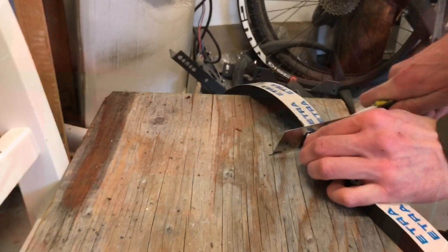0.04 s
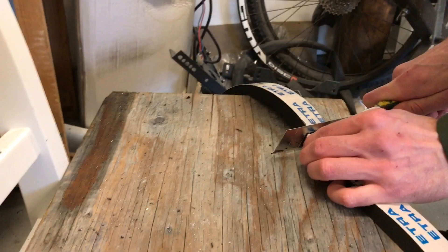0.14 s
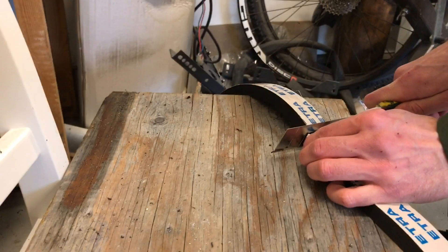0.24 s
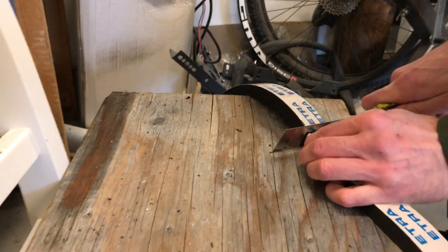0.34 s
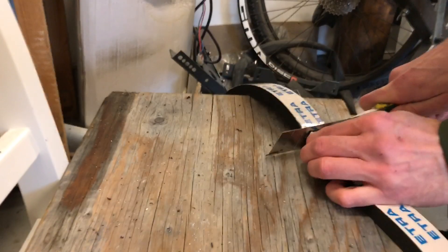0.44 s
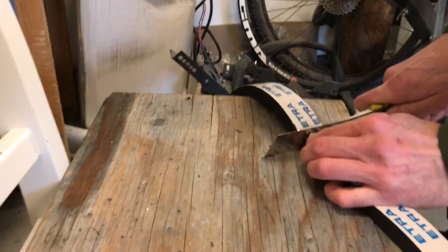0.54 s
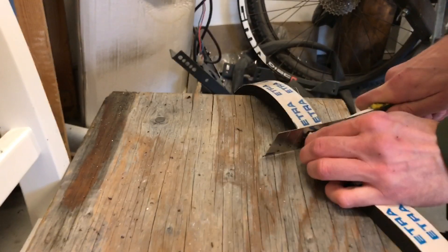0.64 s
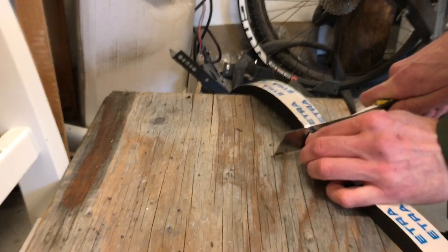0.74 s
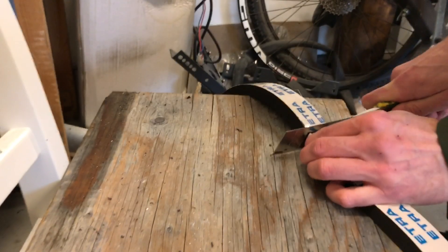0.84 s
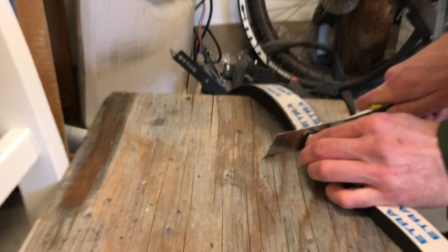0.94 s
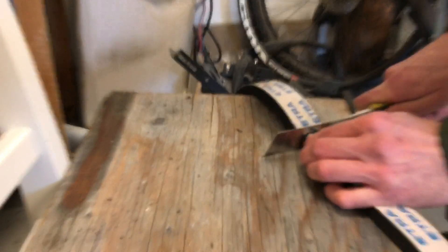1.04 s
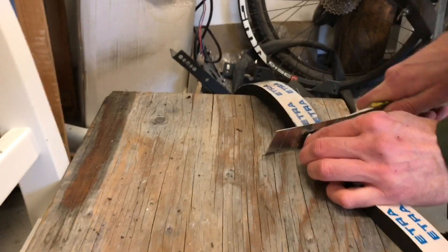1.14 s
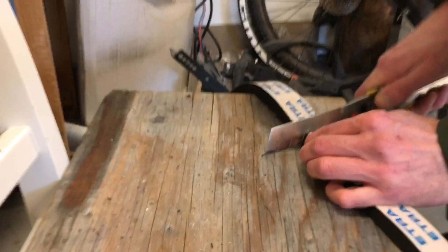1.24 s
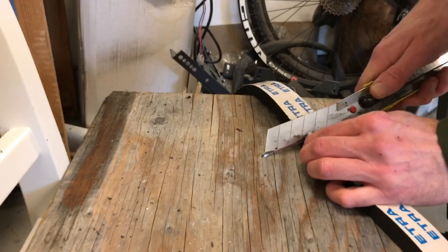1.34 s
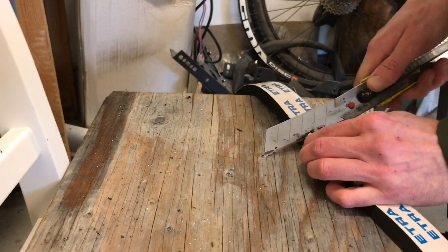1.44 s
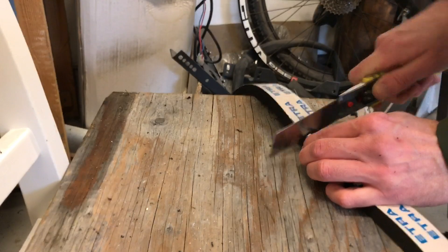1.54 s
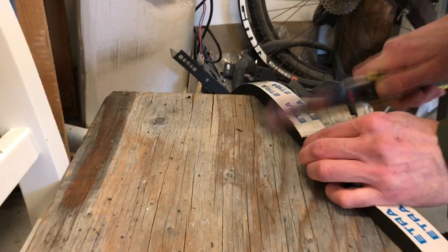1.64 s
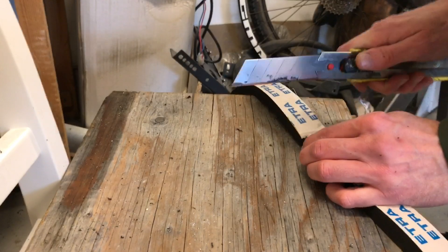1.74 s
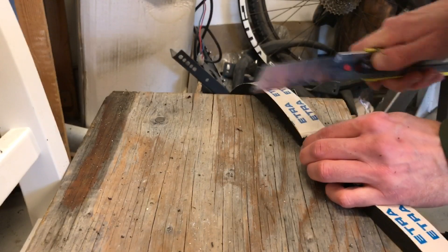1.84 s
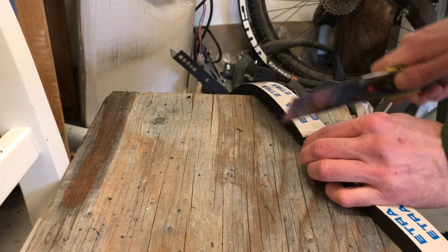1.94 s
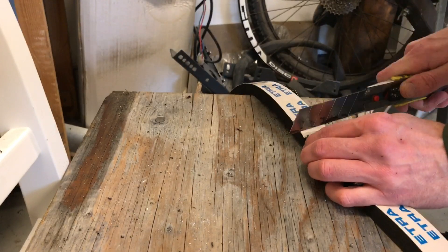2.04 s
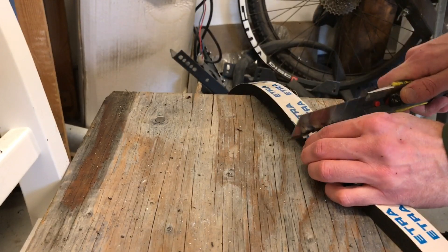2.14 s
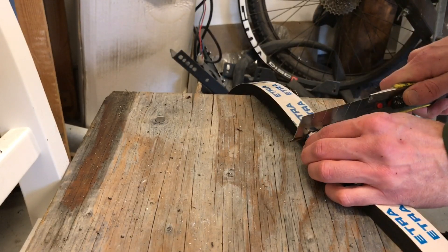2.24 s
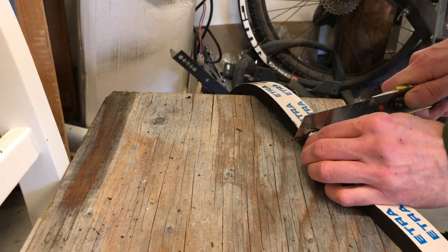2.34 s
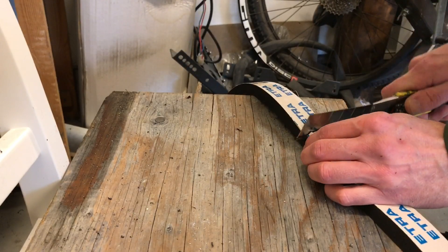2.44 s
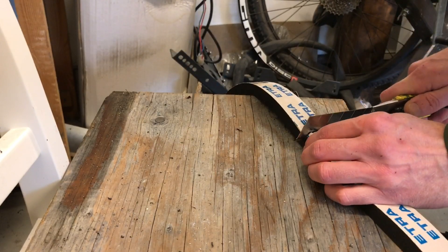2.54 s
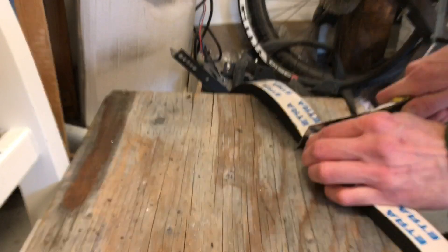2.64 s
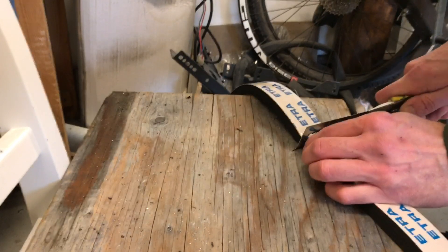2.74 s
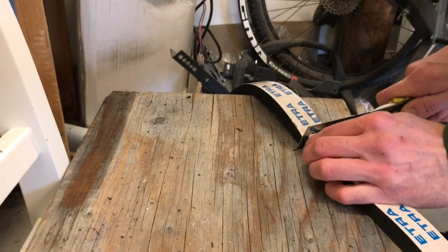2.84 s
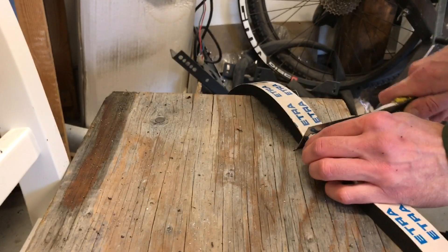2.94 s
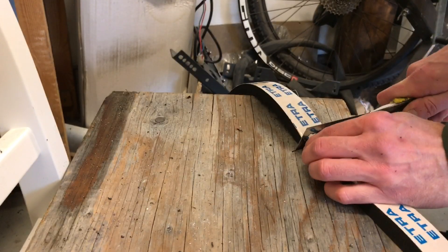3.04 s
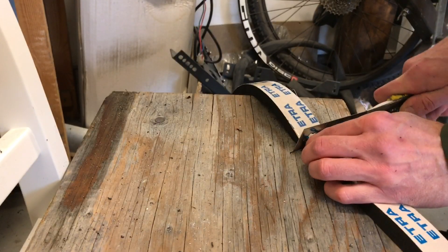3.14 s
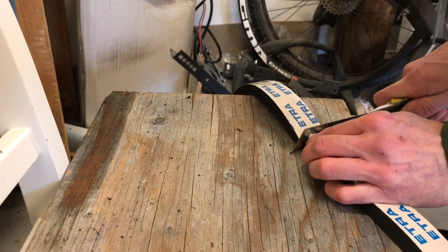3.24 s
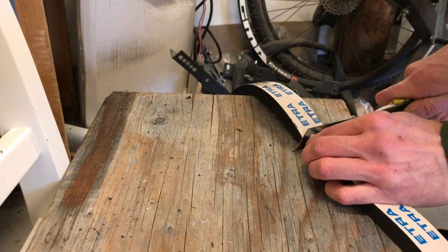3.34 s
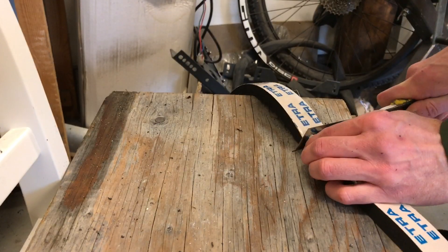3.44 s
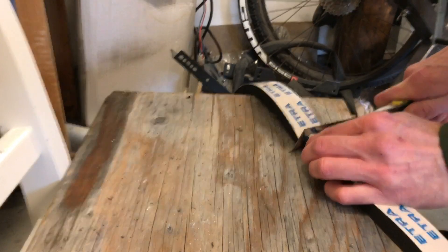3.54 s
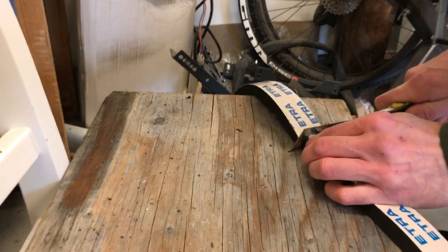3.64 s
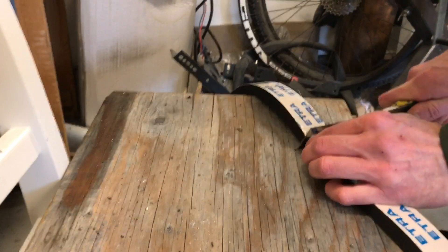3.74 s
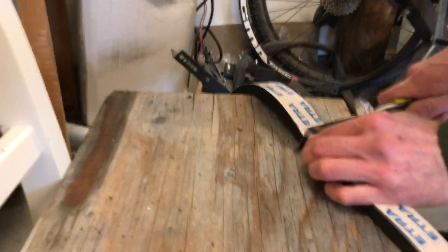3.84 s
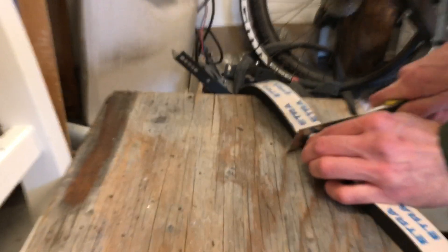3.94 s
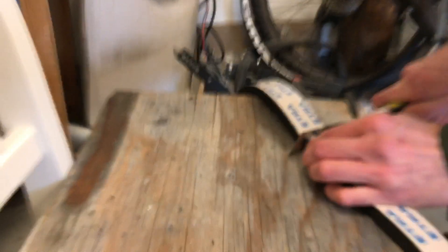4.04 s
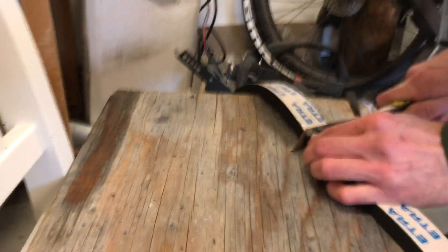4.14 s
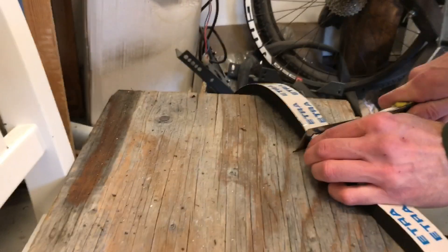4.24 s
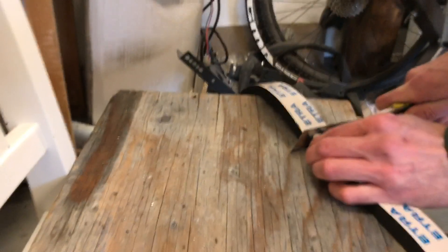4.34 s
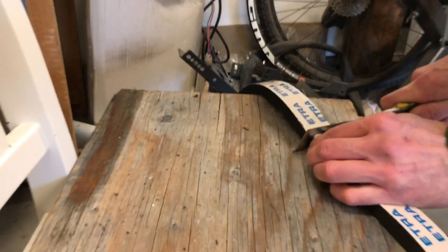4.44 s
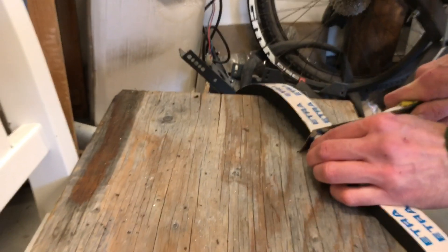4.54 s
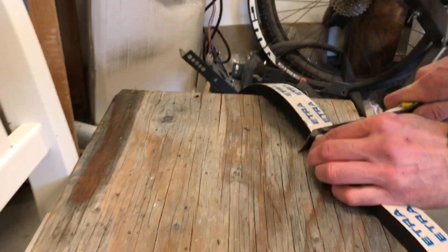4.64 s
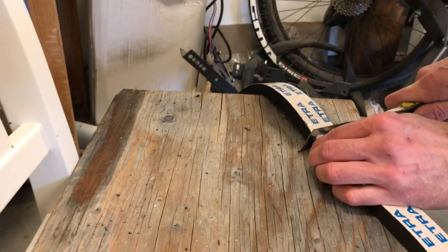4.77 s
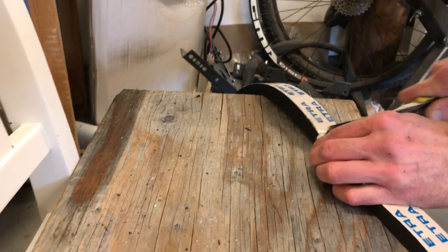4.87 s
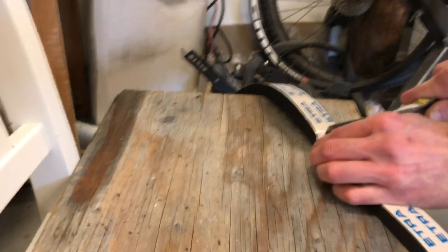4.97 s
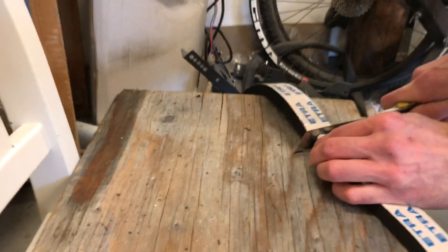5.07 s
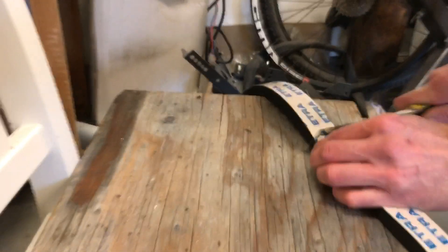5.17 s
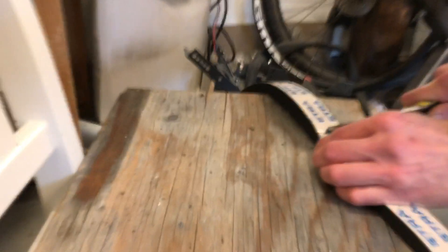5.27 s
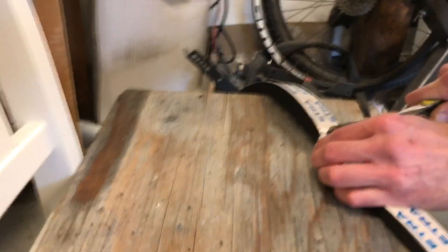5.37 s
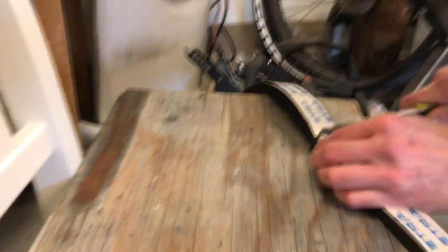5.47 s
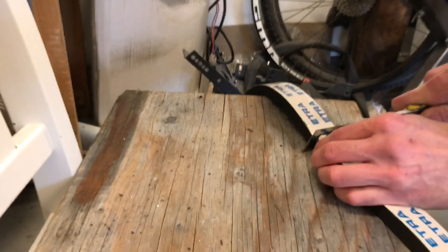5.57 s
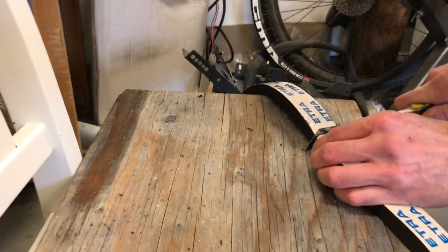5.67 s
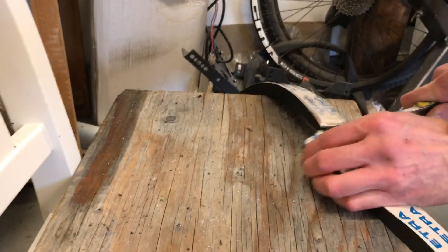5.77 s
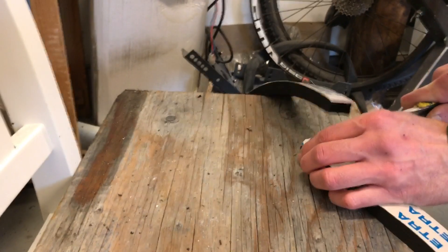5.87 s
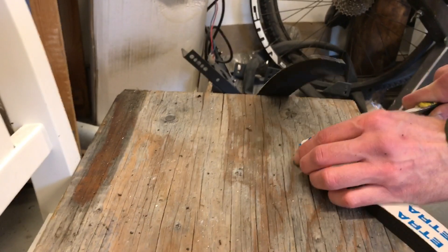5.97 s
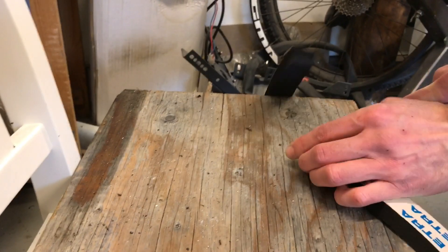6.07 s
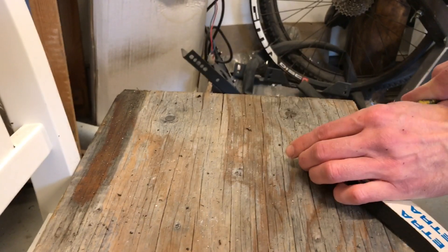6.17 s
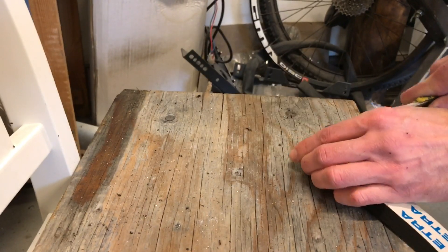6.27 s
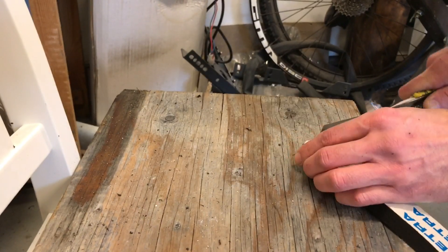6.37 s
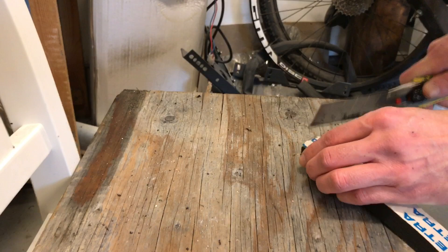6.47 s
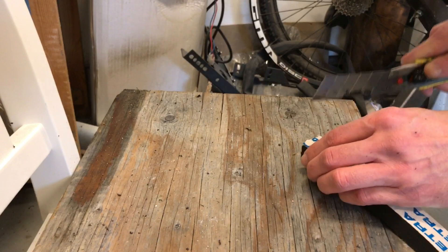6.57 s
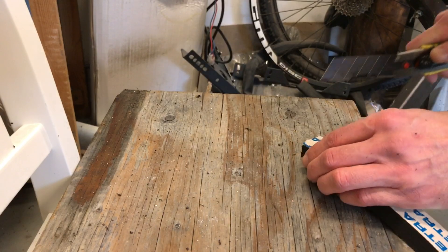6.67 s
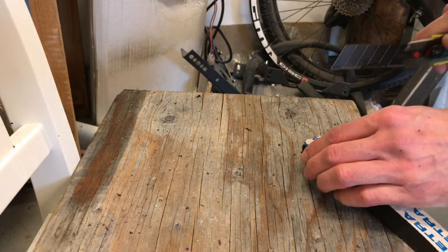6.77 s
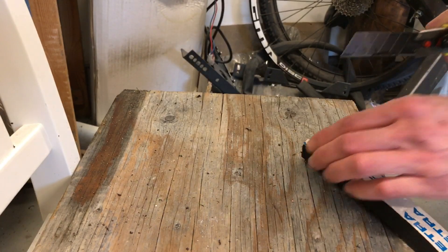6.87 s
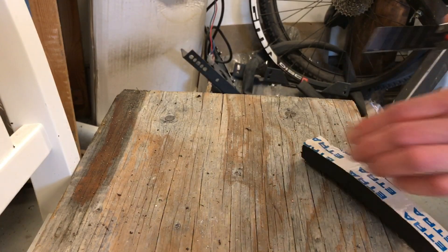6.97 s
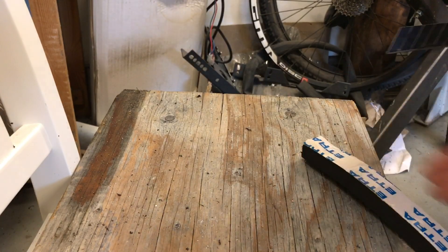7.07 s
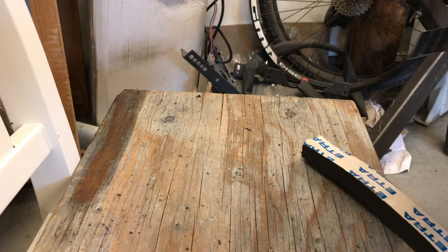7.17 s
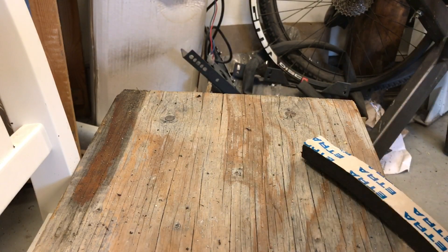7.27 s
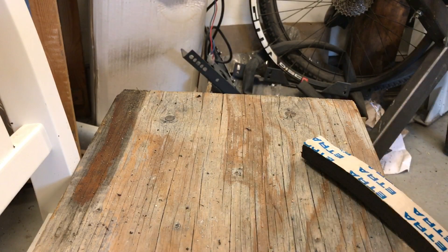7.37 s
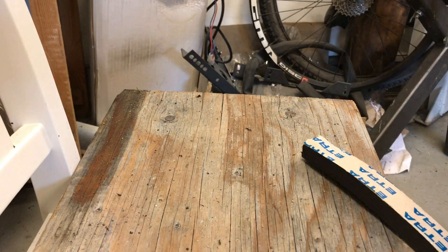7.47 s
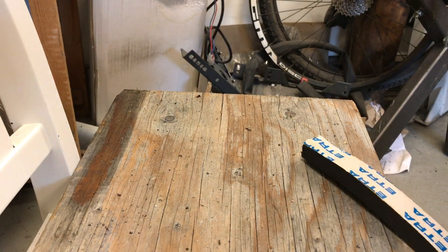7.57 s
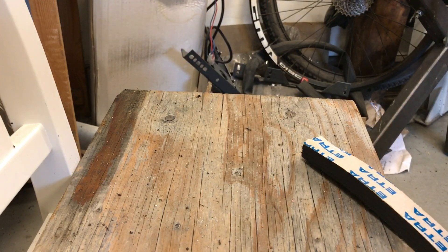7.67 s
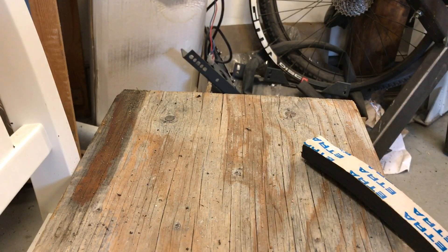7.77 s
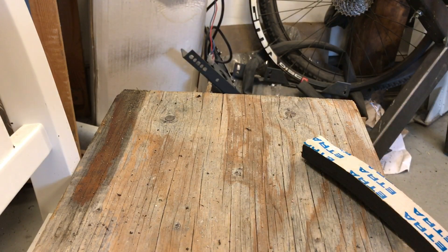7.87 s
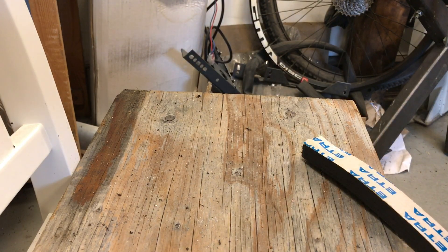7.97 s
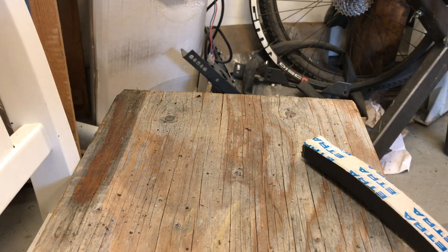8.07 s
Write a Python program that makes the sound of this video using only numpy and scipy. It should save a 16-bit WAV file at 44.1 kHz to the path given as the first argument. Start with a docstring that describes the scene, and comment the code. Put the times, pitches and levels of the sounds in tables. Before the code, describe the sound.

A snap-off knife saws through thick foam tape on a wooden bench, with gritty rasps, metallic clicks, brief squeaks and dull thumps.

```python
"""On a wooden bench in a small workshop, a long snap-off knife saws through thick foam tape, close to a phone.
Each stroke is noisy grit, like tearing foam, that shakes the blade; squeaks are wavering tones with overtones.
Short taps ring the blade as clicks. Blows ring the bench top, rocking hums, and the hands feed a deep rumble.
Faint rustling, a few knocks further off, the room's echo and a steady hiss fill the background."""
import sys
import numpy as np
from scipy import signal
from scipy.fft import rfft, irfft
from scipy.io import wavfile
from scipy.ndimage import uniform_filter1d

SR = 44100
rng = np.random.default_rng(int(sys.argv[2]) if len(sys.argv) > 2 else 0)


def inscribe(sig):
    """Save sig as 16-bit PCM at rate SR to the path in sys.argv[1].

    A 1-D sig is mono; a 2-D sig holds one channel per row.
    Samples are clipped to [-1, 1] before scaling.
    """
    pcm = np.round(np.clip(np.atleast_2d(sig).T, -1, 1) * 32767)
    wavfile.write(sys.argv[1], SR, pcm.astype(np.int16))


N = 357549  # length in samples

# Saw strokes: t/s at full bite, rise/s, hold/s, level/dB, treble share/dB
STROKES = [(0.445, .036, 0.023, -50, -6.5), (0.52, 0.054, 0.0029, -40, -1), (0.702, .005, 0.023, -55.5, -7),
           (0.735, .0014, 0.029, -49, -4), (0.954, 0.04, 0.015, -40.5, -1),
           (1.097, 0.031, 0.0064, -55.5, -7), (1.209, 0.056, 0.023, -58.5, 1),
           (1.508, .003, 0.048, -59, .5), (1.5542, 0.0035, 0.0045, -28.5, -4.5),
           (1.564, .006, 0.036, -46, 1), (2.183, 0.02, .006, -61, -5), (2.443, 0.0074, 0.042, -60.5, -3.5),
           (2.595, 0.0048, 0.051, -46.5, -8.5), (2.636, 0.0054, 0.009, -40.5, -6),
           (3.127, 0.034, 0.043, -56.5, -2), (3.215, .012, 0.0092, -68.5, 6.5),
           (3.317, 0.011, 0.017, -65, -4), (3.581, 0.0014, 0.025, -50.5, 2),
           (3.743, 0.05, 0.027, -55.5, -2), (3.833, 0.0039, 0.0073, -52.5, -4),
           (3.916, 0.027, 0.017, -38.5, -0.5), (3.95, .008, 0.076, -46.5, -26),
           (4.048, .007, 0.032, -53, -7), (4.1386, 0.0054, 0.0078, -42, -11.5),
           (4.16, .01, 0.027, -59.5, 3.5), (4.296, .024, 0.023, -46, -4.5), (4.423, .01, 0.025, -56, -8.5),
           (4.516, 0.0085, 0.049, -46, -4.5), (4.8545, 0.0062, 0.051, -40, -2.5),
           (5.025, .005, 0.049, -51.5, 2), (5.084, 0.025, .012, -38.5, -0.5),
           (5.131, .006, 0.073, -45.5, -3), (5.211, 0.0064, 0.015, -44.5, -9),
           (5.291, 0.019, 0.047, -47, -7), (5.471, 0.0037, 0.078, -40.5, -3.5),
           (5.713, .0063, 0.049, -48, -3), (5.762, .0045, .061, -51, -2), (5.877, .0096, 0.027, -54, -7),
           (5.936, .007, 0.036, -52.5, -13), (6.058, 0.081, 0.0083, -49, -6), (6.08, .005, 0.079, -59, -1),
           (6.245, .006, 0.034, -56.5, -32)]
SAG_DB_PER_S, LET_GO_S = 114, 0.013  # a held stroke loses bite, then lets go
LOW_SHARE_DB = -5
# Where the blade rings: f/Hz, width/Hz, level/dB
BLADE_MODES = [(1700, 200, -38), (2240, 940, 0.5), (2800, 450, -6), (3580, 456, 2), (4200, 350, -2.5),
               (5230, 720, -0.5)]
# Where the blade rings in the treble: f/Hz, width/Hz, level/dB
BLADE_TREBLE_MODES = [(6750, 790, 5.5), (8720, 1000, 7), (11920, 3300, 3.5), (15100, 4900, 0)]

# Squeaks, where the blade sticks and slips: t/s, length/s, first f/Hz, last f/Hz, level/dB, loss per overtone/dB
SQUEAKS = [(0.499, 0.021, 3880, 4200, -42, 11), (0.955, 0.026, 4120, 4170, -38.5, 11),
           (3.575, 0.037, 1700, 1680, -60.5, -2), (4.133, 0.015, 1700, 1700, -50, 13),
           (4.509, 0.018, 928, 1204, -51.5, 6), (4.529, 0.028, 1242, 1120, -47, 2),
           (4.853, 0.016, 1914, 2390, -41, 21), (4.89, 0.021, 7000, 3760, -46, 19),
           (5.158, 0.0118, 3490, 5520, -39.5, 19), (5.198, 0.01, 5470, 3960, -44, 11),
           (5.212, 0.0098, 2440, 1700, -46, 5), (5.472, 0.02, 1700, 1790, -43.5, 8),
           (5.513, 0.013, 1700, 1700, -46, 2.5), (5.704, 0.047, 2284, 5400, -47, 3)]
# the higher a squeak, the more it wavers and breaks off
SQUEAK_ROUGH_HZ, PATCHY_DB, WAVER = 4000, 3, .45
TOP_HZ = 15900  # the phone passes nothing much above this

# Blade clicks: t/s, level/dB (peak before treble), strongest f/Hz, treble share/dB
CLICKS = [(.141, -33, 4170, -20), (.1688, -27.5, 2120, -1), (0.3147, -39, 1470, -24), (.367, -52, 3580, -6),
          (.381, -44, 3850, 2), (0.7087, -45, 3740, 0), (0.7223, -41, 8100, 6.5), (.736, -23.5, 4230, -6.5),
          (0.9297, -36, 1500, -20), (0.937, -39, 4100, -24), (1.4202, -33, 3230, -7),
          (1.4474, -40.5, 2670, -1), (1.515, -41, 5940, 0), (1.5553, -17.5, 2800, -4.5),
          (1.6416, -15.5, 3300, -40), (1.648, -19.5, 2240, -35), (1.6596, -27.5, 2240, -30.5),
          (1.8407, -48.5, 4130, -20), (1.9235, -44.5, 5140, 2), (1.965, -47, 2240, 6),
          (2.2864, -46, 3680, -6), (2.6004, -28.5, 3440, -31), (2.6379, -27, 1810, -23),
          (2.9871, -47, 3260, 3.5), (3.0837, -41, 3500, -4), (3.1123, -43, 3600, 3), (3.126, -49, 3600, 3),
          (3.137, -42.5, 3600, 0), (3.26, -52, 4080, -21), (3.403, -44.5, 3820, 4),
          (3.582, -35.5, 6600, -12), (3.8, -43, 3530, -4), (3.9057, -34, 3370, 2), (3.913, -28, 2600, -31),
          (3.923, -34, 3610, -18), (3.955, -29, 2280, -22), (3.9682, -29, 2410, -8),
          (3.9778, -28.5, 2240, -18), (3.987, -32.5, 2360, -25), (4.0849, -38, 3250, -5),
          (4.1287, -38.5, 2170, -13), (4.278, -40, 2060, -18), (4.3808, -50, 2030, 5),
          (4.526, -34.5, 2240, -0.5), (4.5767, -36.5, 5650, -3), (4.5816, -35, 5760, -1.5),
          (4.8246, -46.5, 1730, -6), (4.8436, -32.5, 3770, -3), (4.8576, -39, 2230, -30),
          (4.886, -32, 6660, -16), (5.0192, -33.5, 3460, -7), (5.0254, -30, 4000, -1),
          (5.0319, -26.5, 3730, -1.5), (5.087, -35, 5030, 16), (5.1317, -35, 2550, -11),
          (5.1422, -39, 3610, -21), (5.458, -40, 3690, -2), (5.47, -47, 1680, -24),
          (5.76, -33.5, 4700, -0.5), (5.98, -47, 1720, 3), (6.0596, -33.5, 3700, -21),
          (6.443, -49.5, 8000, 8), (6.4531, -39, 1560, -14)]
CLICK_ROOM_DB = -11.5
KNIFE_LIFTS_S = 6.2
# faint ticks at random moments while the knife is in the foam
TICK_DB, TICK_HZ, TICK_TREBLE_DB = -50, 3700, -10

# Blows on the bench: t/s, peak level/dB, extra for board modes above 400 Hz/dB
THUDS = [(0.312, -27, 5), (.657, -50, 8), (.72, -41.5, 10), (.871, -32.5, -3.5), (.955, -36, 15),
         (1.247, -47, -17), (1.549, -35.5, -16), (1.641, -37.5, -17), (2.598, -46, 13), (2.638, -45, -2),
         (3.541, -52, 0), (3.656, -40, 13), (3.749, -53, -5), (3.866, -45, 11), (4.308, -30.5, -9),
         (4.86, -43, 2), (5.09, -25, -5), (5.13, -32.5, 7), (5.31, -49, -5), (5.39, -44, 0),
         (5.72, -54, -8), (5.759, -47, 12), (5.868, -49, 13), (6.306, -39.5, -9), (7.482, -44.5, 6),
         (6.865, -50, -2)]
# Where the bench top rings: f/Hz, time to fade by 60 dB/s, level/dB
BENCH_MODES = [(184, 0.047, 1.5), (269.2, 0.042, 2), (320.3, 0.058, -16.5), (400, 0.017, 6.5),
               (558, 0.025, 2), (696, 0.071, -6), (886, 0.037, -14.5), (1083, 0.05, -18)]
THUD_RISE_MS = 5.4
RATTLE_DB, RATTLE_T60_S = -26, 0.46  # the board rattles on after each blow
# The bench rocks on its legs and rings out: t/s, level/dB, f/Hz, time to fade by 60 dB/s
ROCKS = [(0.451, -39.5, 102.3, 0.3), (1.03, -52, 96, 0.14), (1.565, -41.5, 98.8, 0.46),
         (2.476, -48, 99.6, 0.26), (2.645, -28.5, 97.9, 0.19), (2.731, -52.5, 98.8, 0.88),
         (6.448, -41.5, 98, .45)]
# Steady weight of the hands on the bench: t/s, rumble level/dB
PRESS = [(0, -65), (1.5, -69.5), (2.5, -69), (3.38, -71.5), (3.54, -61.5), (3.86, -54.5), (4.26, -54),
         (4.8, -60), (5.35, -51.5), (5.68, -63), (5.93, -61.5), (6.27, -71), (6.65, -71.5), (7.45, -69),
         (7.65, -67.5), (8.1, -73.5)]
BOARD_PRESS_DB = -6
# Shoves that drag the bench: t/s at strongest, rumble level/dB, share of the top board/dB
SHOVES = [(.01, -55.5, -6), (.36, -60, -9), (.47, -47.5, -2.5), (.72, -49, -6), (1.04, -44.5, -7),
          (1.26, -56, -19), (1.62, -55, -10), (2.66, -50, -15), (3.95, -52.5, -1.5), (4.06, -48.5, -6.5),
          (4.34, -49, -5), (4.9, -53.5, -5), (5.1, -48.5, -3.5), (5.19, -48, -24), (5.55, -53, -9),
          (5.74, -56, -9), (5.88, -60, -8), (6.47, -56.5, 2.5)]
SHOVE_UP_DB_PER_S, SHOVE_DOWN_DB_PER_S = 201, 143

# Foam, paper and sleeves rustling: t/s, level/dB, share that rings the blade/dB
RUSTLE = [(0.0, -67, -15), (0.13, -70.5, -21), (0.36, -65, -20), (0.86, -64.5, -11), (1.46, -66.5, -10.5),
          (1.62, -60, 11), (1.98, -71.5, -24), (3.54, -65.5, -15), (3.99, -63.5, -21), (4.87, -67.5, -43),
          (5.05, -59.5, -5), (5.44, -65, -16), (5.71, -59.5, -2), (6.45, -67, -21), (6.56, -63.5, -4),
          (7.58, -63.5, 4), (7.96, -69.5, -0.5), (8.1, -75.5, -3)]

# Knocks further off: t/s, peak level/dB, lowest f/Hz, highest f/Hz, clatter length/ms,
# treble share/dB, room share/dB, ring level/dB, strongest ring f/Hz
KNOCKS = [(6.304, -28, 640, 1440, 3.2, -8.5, 2.5, -13.5, 1000),
          (6.371, -36, 400, 1650, 2.7, -5.5, 0, -19, 1000),
          (6.499, -30, 2800, 10800, 3.6, -16, -8, -18, 4700),
          (6.771, -27, 2544, 7500, 5.6, -6, -6.5, -24.5, 5400),
          (7.481, -21.5, 413, 2560, 5, -42, -2.5, -20, 1000)]
# Wood (1000 Hz) and metal that ring after a knock: f/Hz, time to fade by 60 dB/s, level/dB
KNOCK_RINGS = [(1000, 0.24, -1), (3300, .15, 4), (4770, 0.18, -3), (5400, 0.49, -7)]

# How the room fades, band by band: f/Hz, time to fade by 60 dB/s, level/dB
ROOM = [(203, 0.11, -3.5), (519, 0.37, 3), (1346, 0.48, -1), (3210, 0.4, 0.5), (7000, 0.23, -1),
        (14100, 0.23, -5.5)]
# Tone colour of the steady background: f/Hz, relative level in each Hz/dB
AIR = [(15, -71), (25, -8), (59, -16), (223, 7), (503, 1), (887, -3), (1190, -1), (1330, -23), (3080, -29),
       (3520, -29), (7920, -70), (12900, -15), (16000, -4.5)]
AIR_DB = -67.5


def undb(db):
    """Turn decibels into a plain gain."""
    return 10 ** (np.asarray(db) / 20)


def unit(x):
    """Scale to an average strength (rms) of 1."""
    return x / np.sqrt(np.mean(x ** 2))


def band(x, lo_hz, hi_hz, order=2):
    """Keep the sound between two frequencies."""
    edges = [lo_hz, min(hi_hz, SR / 2.1)]
    return signal.sosfilt(signal.butter(order, edges, "band", fs=SR, output="sos"), x)


def ring(x, modes):
    """Let x shake several resonances and add them up with alternate signs."""
    out = 0
    for k, (hz, width, db) in enumerate(modes):
        out = out + (-1) ** k * undb(db) * band(x, hz - width / 2, hz + width / 2, order=1)
    return out


def curve(rows, outside=None):
    """Join the rows of a table by straight lines: one value per sample for each column."""
    s, *columns = np.transpose(rows)
    return [np.interp(np.arange(N) / SR, s, c, outside, outside) for c in columns]


def add(out, s, x):
    """Mix x in at time s."""
    i = int(s * SR)
    out[i:i + len(x)] += x[:N - i]


def walk(rate):
    """Wander between random levels, rate of them each second, with rms 1."""
    k = int(SR / rate)
    steps = np.repeat(rng.standard_normal(N // k + 1), k)
    return unit(uniform_filter1d(steps, k)[:N])


def fade_db(t, t60):
    """The dB lost after t seconds, for a sound that fades by 60 dB in t60 seconds."""
    return 60 * t / t60


def grit(per_s, spread_db, hiss):
    """Foam cells bursting: random impulses of uneven size over a hiss."""
    when = rng.random(N) < per_s / SR
    size = np.minimum(rng.exponential(size=N), 3)
    sign = np.sign(rng.standard_normal(N))
    bursts = unit(when * sign * undb(spread_db * size))
    return unit(bursts + hiss * rng.standard_normal(N))


def strokes():
    """Tearing cells shake the blade; the drag grips and lets go every few ms."""
    force = grit(per_s=4000, spread_db=4.5, hiss=1.0) * undb(3.05 * walk(250))
    force /= np.sqrt(uniform_filter1d(force ** 2, SR // 60))  # even out the push over about 17 ms
    body = unit(ring(force, BLADE_MODES) + .5 * band(force, 1300, 7880))
    treble = unit(ring(force, BLADE_TREBLE_MODES) + 0.71 * band(force, 5700, 17600))
    low = unit(band(force, 360, 2280))
    gain, treble_gain = np.zeros(N), np.zeros(N)
    for s, rise, hold, db, treble_db in STROKES:
        corners = np.cumsum([s - rise, rise, hold, LET_GO_S])
        end_db = db - SAG_DB_PER_S * hold
        levels = [db - 22, db, end_db, end_db - 22]
        bite_db = curve(np.transpose([corners, levels]), -150)[0]  # near silence outside the stroke
        gain += undb(bite_db)
        treble_gain += undb(bite_db + treble_db)
    return gain * (undb(-2.0) * body + undb(LOW_SHARE_DB) * low) + treble_gain * treble


def squeaks():
    """Regular slips of the blade make a tone with overtones and a wavering pitch."""
    out = np.zeros(N)
    for s, length, first_hz, last_hz, db, loss_db in SQUEAKS:
        u = np.linspace(0, 1, int(length * SR))  # progress through the squeak
        noise = rng.standard_normal((2, 4000))
        pitch_wobble, level_wobble = uniform_filter1d(noise, 40, axis=1)[:, :len(u)]
        rough = np.sqrt(first_hz * last_hz) / SQUEAK_ROUGH_HZ
        slow_wobble = unit(uniform_filter1d(rng.standard_normal(4000), 250))[:len(u)]
        patchy_db = PATCHY_DB * rough * slow_wobble
        hz = first_hz * (last_hz / first_hz) ** u
        phase = 2 * np.pi * np.cumsum(hz * (1 + WAVER * rough * pitch_wobble)) / SR
        tone = 0
        for k in range(5):
            audible = (k + 1) * hz < TOP_HZ
            tone = tone + undb(-loss_db * k) * np.sin((k + 1) * phase) * audible
        ends = np.sin(np.pi * u) ** 0.11  # soft start and stop
        add(out, s, undb(db) * tone * ends * undb(14.0 * level_wobble + patchy_db))
    return out


def clicks():
    """A sharp tap rings the blade modes nearest its pitch; returns direct sound and what the room gets."""
    near, far, t = np.zeros(N), np.zeros(N), np.arange(600) / SR
    ticks = []
    for when, size in rng.random(size=(10, 2)):
        ticks.append((KNIFE_LIFTS_S * when, TICK_DB + 4 * (size - .5), TICK_HZ, TICK_TREBLE_DB))
    for s, db, hz, treble_db in CLICKS + ticks:
        tap = rng.standard_normal(len(t)) * np.exp(-t / 0.0014) * np.minimum(t / 0.00025, 1)
        # modes lose 14 dB for each octave away from the click's pitch
        modes = [(f, w, g - 14 * abs(np.log2(f / hz))) for f, w, g in BLADE_MODES]
        body = ring(tap, modes) + 0.21 * band(tap, 1330, 7800)
        treble = ring(tap, BLADE_TREBLE_MODES)
        x = undb(db) * (body / abs(body).max() + undb(treble_db) * treble / abs(treble).max())
        add(near, s, x)
        add(far, s, undb(CLICK_ROOM_DB) * blow(x, hz / 1.5, hz * 1.42, treble_db))
    return near, far


def bench():
    """The wood under the knife: blows, rocking and the rumble under the hands."""
    return thuds() + rocks() + hands()


def thuds():
    """A blow sets the modes of the bench top ringing, each fading at its own pace."""
    out, t = np.zeros(N), np.arange(SR // 2) / SR
    for s, db, high_db in THUDS:
        x = np.zeros(len(t))
        for hz, t60, mode_db in BENCH_MODES:
            phase, luck = rng.standard_normal(2)
            level_db = mode_db + 2 * luck + high_db * (hz > 400)
            x += undb(level_db - fade_db(t, t60)) * np.sin(2 * np.pi * hz * t + phase)
        x *= 1 - np.exp(-(1000 * t / THUD_RISE_MS) ** 2)  # soft contact: the ring builds up
        add(out, s, undb(db) * x / abs(x).max())
    return out


def rocks():
    """The frame rocks on its legs: one low tone that builds quickly and rings out."""
    out, t = np.zeros(N), np.arange(SR // 2) / SR
    for s, db, hz, t60 in ROCKS:
        rise = np.minimum(t / 0.011, 1)
        add(out, s, undb(db - fade_db(t, t60)) * rise * np.sin(2 * np.pi * hz * t))
    return out


def hands():
    """Weight and shoves feed a deep frame rumble and a higher board one, which also rattles after blows."""
    t = np.arange(N) / SR
    press = undb(curve(PRESS)[0])
    shoved, on_board, rattle = np.zeros(N), np.zeros(N), np.zeros(N)
    for s, db, board_db in SHOVES:
        drop_db = np.maximum(SHOVE_UP_DB_PER_S * (s - t), SHOVE_DOWN_DB_PER_S * (t - s))
        shove = undb(db - drop_db)
        shoved += shove
        on_board += undb(board_db) * shove
    for s, db, _ in THUDS:
        rattle += (t > s) * undb(db + RATTLE_DB - fade_db(abs(t - s), RATTLE_T60_S))
    deep_push = rng.standard_normal(N) * undb(3 * walk(25))
    board_push = rng.standard_normal(N) * undb(4 * walk(30))
    deep = unit(band(deep_push, 46.0, 116.7, order=3))
    board = band(board_push, 121, 289) + .5 * band(board_push, 690, 706, order=1)
    board = unit(board + 0.037 * band(board_push, 220, 1360))
    board_gain = np.hypot(undb(BOARD_PRESS_DB) * press, on_board) + rattle
    return np.hypot(press, shoved) * deep + board_gain * board


def rustle():
    """Faint crackle; while the knife is in the foam, small slips come and go on the strongest blade mode."""
    force = grit(per_s=2500, spread_db=3, hiss=1.5)
    flicker, slips = undb(1.5 * walk(30)), undb(5 * walk(14))
    db, blade_db = curve(RUSTLE)
    in_foam = np.arange(N) / SR < KNIFE_LIFTS_S
    blade = in_foam * undb(blade_db) * unit(slips * band(force, 3530, 3970, order=1))
    crackle = band(force, 400, 7350, order=1) + 0.19 * band(force, 8840, 15500)
    return undb(db) * (blade + unit(flicker * crackle))


def knocks():
    """A short noise burst like many small impacts; wood or metal parts ring on. Returns direct and room sound."""
    near, far, t = np.zeros(N), np.zeros(N), np.arange(SR // 3) / SR
    for s, db, lo_hz, hi_hz, ms, treble_db, room_db, ring_db, ring_hz in KNOCKS:
        rise = np.minimum(1000 * t / (ms / 3), 1)
        crack = rng.standard_normal(len(t)) * np.exp(-1000 * t / ms) * rise
        treble = band(crack, 1900, 9000, order=1) + 0.57 * band(crack, 10400, 14900)
        x = band(crack, lo_hz, hi_hz) + undb(treble_db) * treble
        x *= undb(db) / abs(x).max()
        ringing = np.zeros(len(t))
        for f, t60, mode_db in KNOCK_RINGS:
            tone = unit(band(rng.standard_normal(len(t)), f - 120, f + 120))
            off_pitch_db = 40 * abs(np.log2(f / ring_hz))  # 40 dB less per octave away
            ringing += undb(mode_db - off_pitch_db - fade_db(t, t60)) * tone
        add(near, s, x + undb(db + ring_db) * ringing)
        add(far, s, undb(room_db) * blow(x, lo_hz * 1.3, hi_hz, treble_db))
    return near, far


def blow(like, lo_hz, hi_hz, treble_db):
    """One smooth impulse with the energy of a hit: what the walls send back has lost the fine colour."""
    pulse = 1. * (np.arange(len(like)) == 0)
    x = band(pulse, lo_hz, hi_hz, order=1) + undb(treble_db) * band(pulse, 2700, 14000, order=1)
    return x * np.sqrt(np.sum(like ** 2) / np.sum(x ** 2))


def room(x):
    """Blurred echo that builds over a few ms and fades band by band."""
    t = np.arange(int(SR / 2)) / SR
    tail = np.zeros(len(t))
    for hz, t60, db in ROOM:
        noise = band(rng.standard_normal(len(t)), hz / 1.86, hz * 1.16)
        tail += undb(db - fade_db(t, t60)) * noise
    tail *= np.minimum(t / 0.0078, 1)
    return signal.fftconvolve(x, tail / np.sqrt(np.sum(tail ** 2)))[:N]


def air():
    """Steady room tone and microphone hiss: random noise shaped by frequency."""
    hz, db = np.transpose(AIR)
    f = np.maximum(np.arange(N // 2 + 1) * SR / N, 1)
    colour = undb(np.interp(np.log(f), np.log(hz), db))
    return undb(AIR_DB) * unit(irfft(rfft(rng.standard_normal(N)) * colour, N))


def scene():
    """Knife and bench close by, the room around them."""
    cut, squeak, wood = strokes(), squeaks(), bench()
    (click, click_far), (knock, knock_far) = clicks(), knocks()
    to_room = click_far + knock_far + undb(-21) * squeak + undb(-12.5) * cut + undb(-15.5) * wood
    close = cut + squeak + click + wood + rustle()
    return (close + knock + room(to_room) + air())[None]


def record(dry):
    """The phone cuts the top: a steep low-pass filter."""
    return signal.sosfilt(signal.ellip(10, .2, 80, TOP_HZ, fs=SR, output="sos"), dry)


dry = scene()
out = record(dry)
inscribe(out)
```